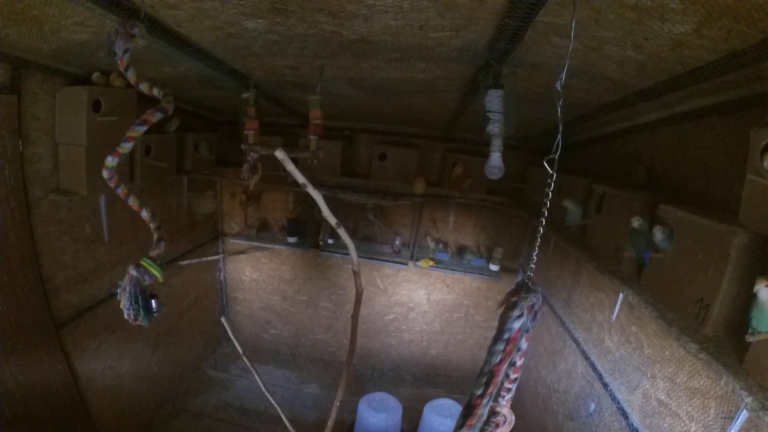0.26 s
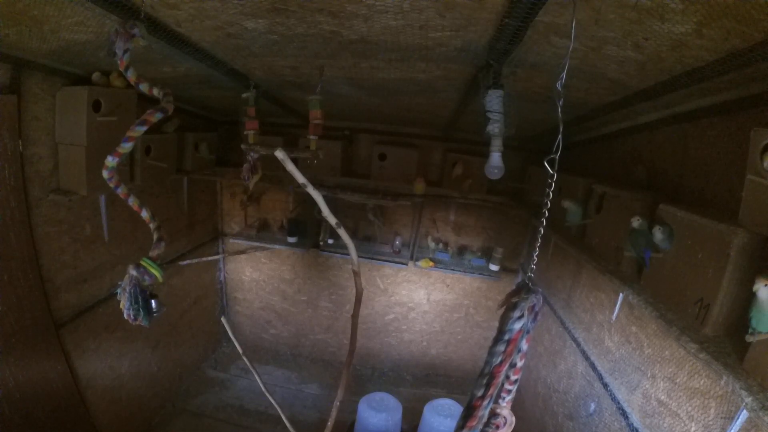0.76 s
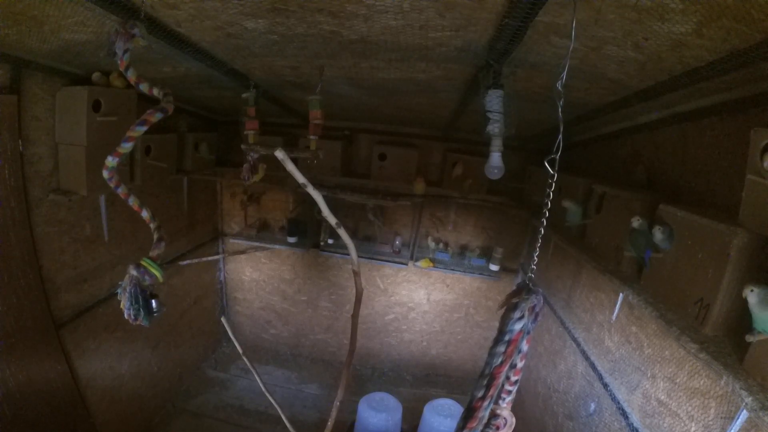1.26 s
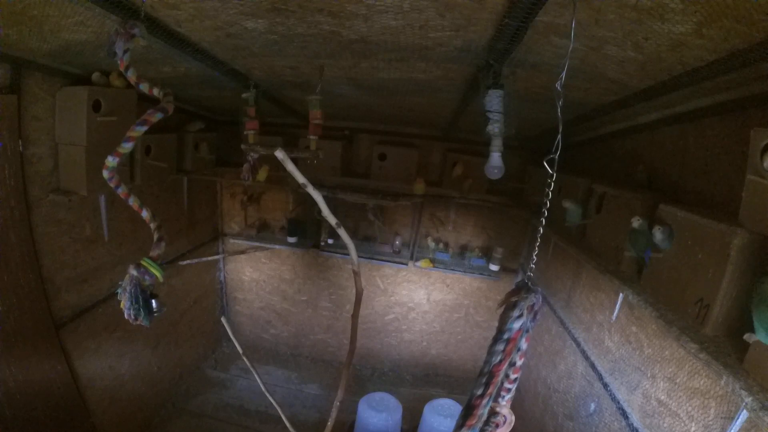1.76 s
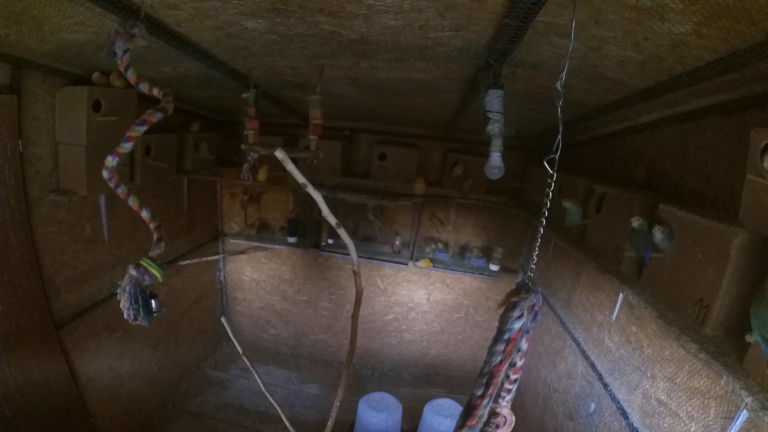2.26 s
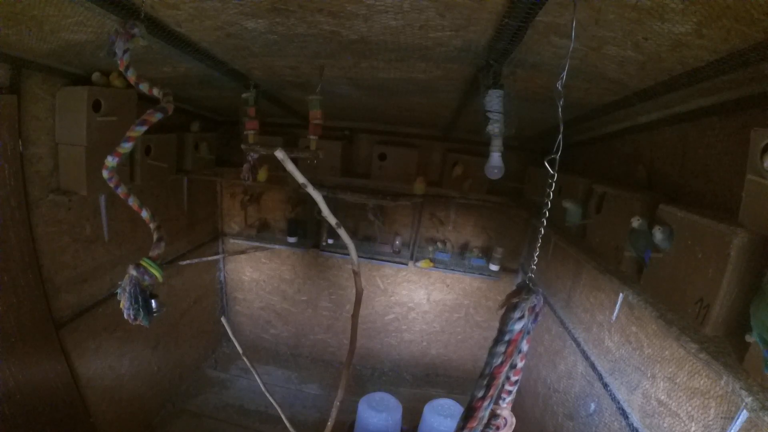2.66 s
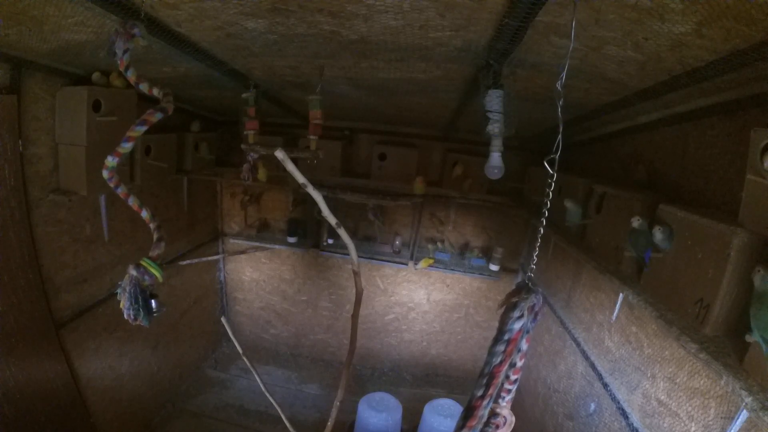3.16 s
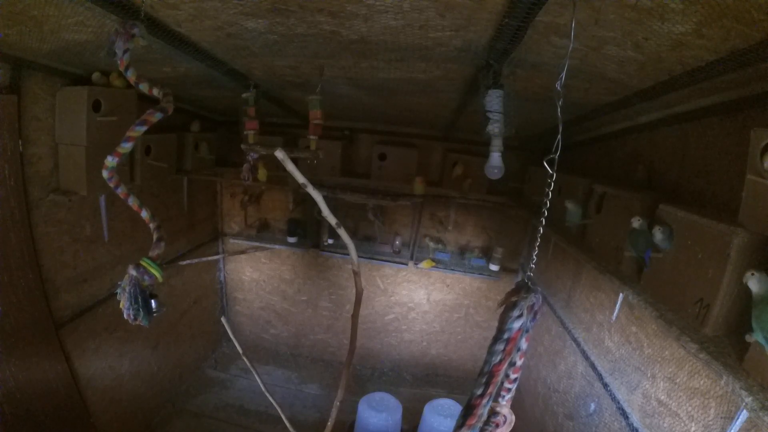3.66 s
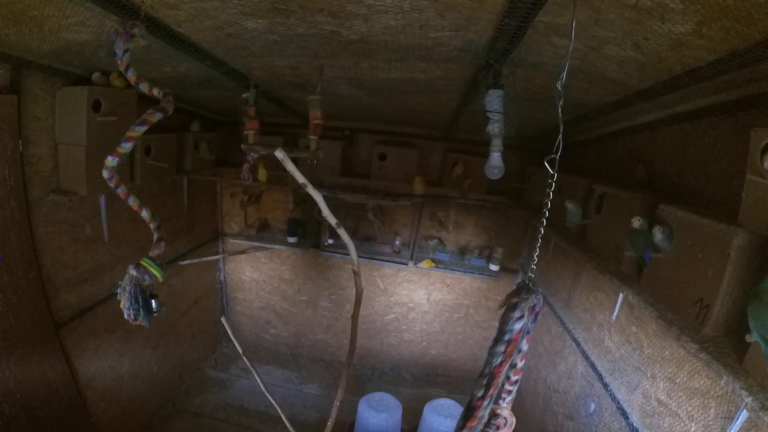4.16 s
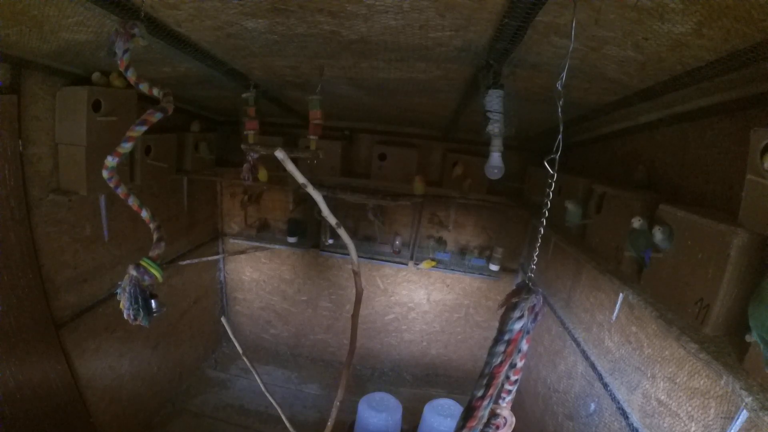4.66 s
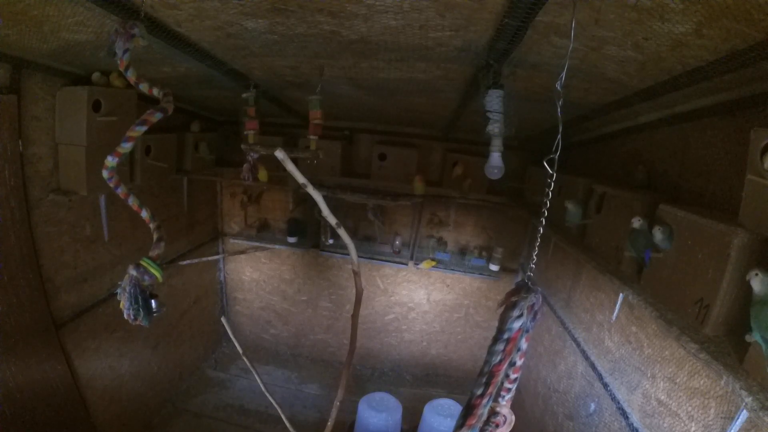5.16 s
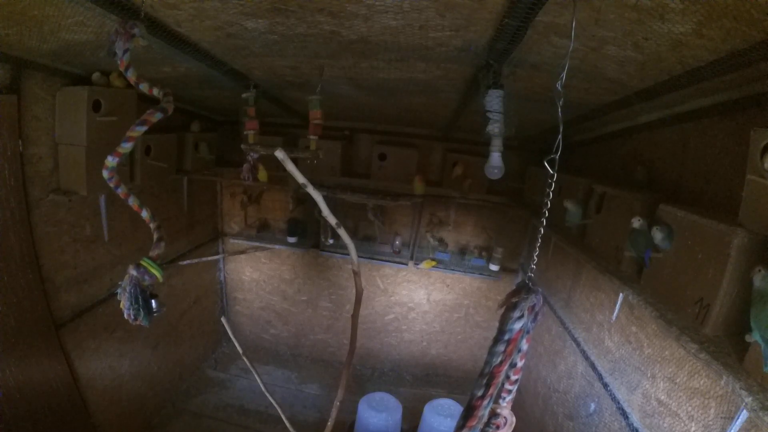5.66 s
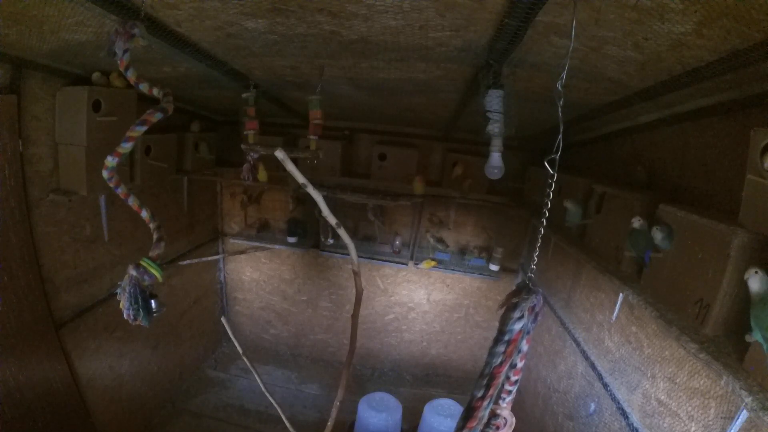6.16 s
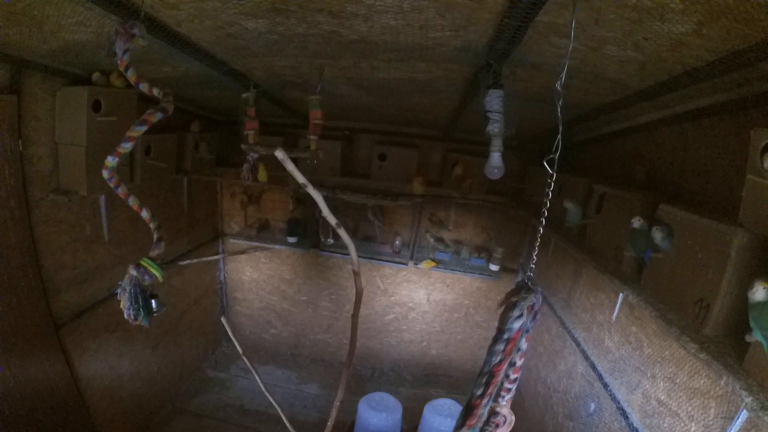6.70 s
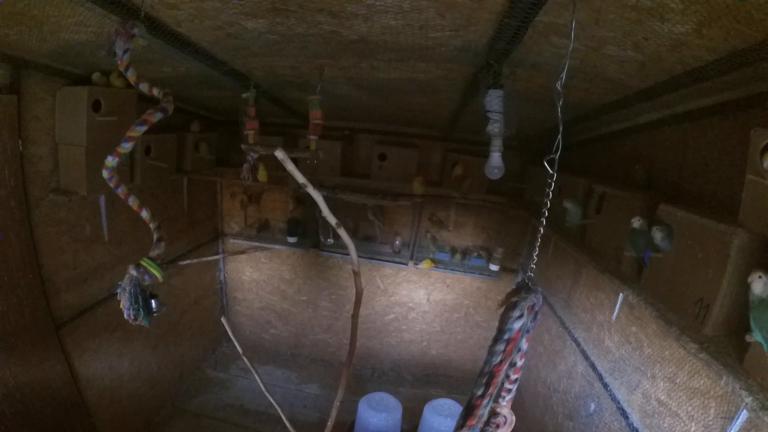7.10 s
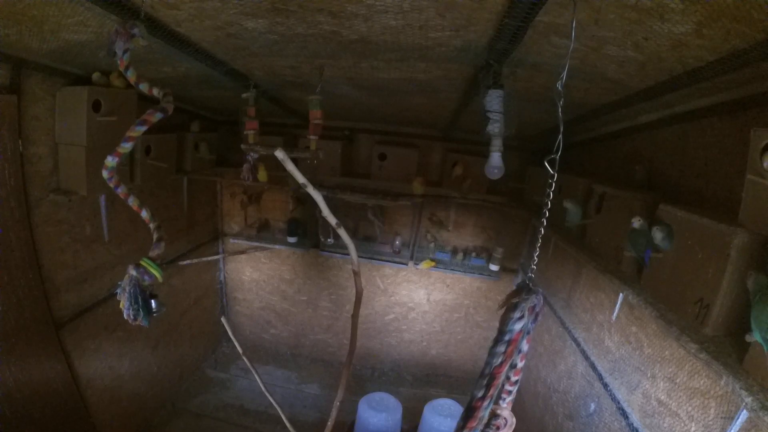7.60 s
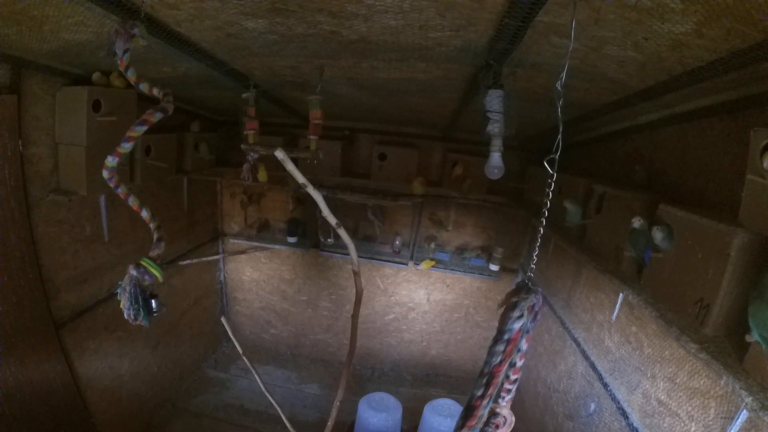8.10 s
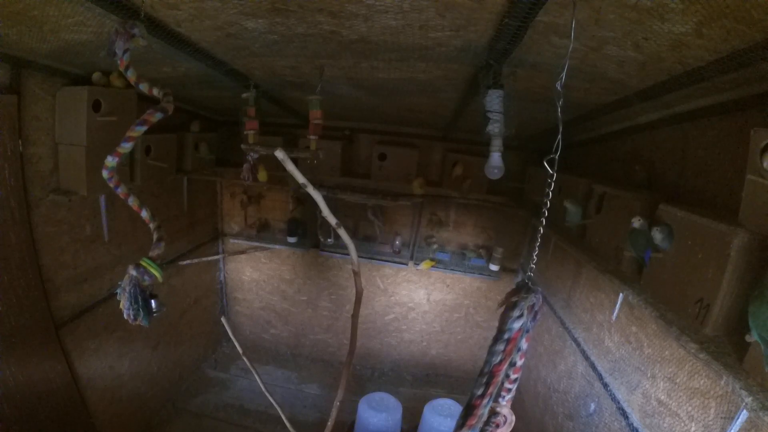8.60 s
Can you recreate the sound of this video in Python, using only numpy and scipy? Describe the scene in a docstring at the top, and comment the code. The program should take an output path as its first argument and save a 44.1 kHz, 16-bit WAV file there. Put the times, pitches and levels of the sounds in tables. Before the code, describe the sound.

A faint, low ventilation hum runs behind small parrots calling close by in a small wooden enclosure. Their shrill chirps flick upward in pitch, mixed with peeps and short gliding squeaks, some of them hoarse. The first half is busy; after a lull comes a quick cluster of chatter, a few isolated peeps and another squeaky burst at the end. The space adds only a very short echo.

```python
"""In a small boarded aviary, lovebirds give rising chirps that flip to a higher register, arched peeps
and chatter of short gliding squeaks. Each call is an oscillation of the syrinx, coloured by throat and
beak, that doubles its period and buzzes as it turns hoarse; the boards reflect it. Behind the birds a
ventilation fan hums, drives air through a duct and scrapes faintly against its housing.
A slipping sample clock modulates the phase of the whole sound, which gives loud notes a gritty edge."""
import sys
import numpy as np
from scipy import signal
from scipy.fft import rfft, irfft
from scipy.io import wavfile
from scipy.ndimage import map_coordinates

SR = 44100
rng = np.random.default_rng(int(sys.argv[2]) if len(sys.argv) > 2 else 0)


def master(y):
    """Save y as 16-bit WAV."""
    cut = np.clip(np.atleast_2d(y).T, -1, 1)
    pcm = np.round(cut * 32767)  # scale
    wavfile.write(sys.argv[1], SR, pcm.astype(np.int16))


N = 389844
TIME = np.arange(N) / SR

# lines of the fan's hum: pitch_hz, level_db
HUM_TONES = [(68, -63.5), (91, -75), (136, -71), (205, -78)]
# spectra of the draught's rumble and hiss: frequency_hz, relative_density_db
RUMBLE_SPECTRUM = [(10, 2), (25, 2.5), (50, -3), (90, -9.5), (160, -21.5), (300, -26.5), (600, -34.5),
                   (1100, -40.5), (1900, -49)]
HISS_SPECTRUM = [(1500, 7.5), (2500, 0), (4000, 7), (6000, 0.5), (9000, -11), (12000, -2), (15500, -4)]
# slow envelope of the rumble: time_s, relative_db
RUMBLE_ENVELOPE = [(0, -52.5), (.8, -49.5), (1.6, -53.5), (3.9, -56), (6.2, -58.5), (8.84, -53.5)]
# swells of the rush of air in the duct: peak_s, half_width_s, level_db
DUCT_GUSTS = [(0, 0.39, -58), (2.701, .5, -80), (5.0, 0.58, -71)]
# tones of the duct, relative to the rush: pitch_hz, relative_db
DUCT_MODES = [(573, -14), (609, -9.5), (690, -14.5), (764, -13.5), (1024, -12)]
# resonances of the fan housing: frequency_hz, bandwidth_hz, relative_db
HOUSING_MODES = [(1460, 410, -5), (2294, 200, 5), (2530, 210, 5.5), (2980, 200, 2.5), (4050, 840, -9),
                 (8700, 3500, -17)]
# partials of the syrinx, the half multiples due to period doubling: pitch_multiple, relative_db
SYRINX_PARTIALS = [(.5, -26), (1.5, -20.5), (2, -19.5), (2.5, -24.5), (3, -32.5)]
# response of throat and beak to those partials: frequency_hz, gain_db
THROAT_RESPONSE = [(1600, -7), (2300, 2), (5200, 5), (6600, 0), (7600, 3.5), (9000, -9), (11500, -1.5),
                   (13000, -2), (15500, -12.5)]
# chirps: start_s, lead_s, loud_s, pitch_hz, top_hz, lead_db, loud_db, top_db, hoarseness
CHIRP_CALLS = [ (0.019, 0.012, 0.024, 4990, 6344, -37.5, -25, -26.5, 0.48),
               (.130, .010, .032, 4110, 6400, -33, -20.5, -27, .33),
               (.347, .026, .016, 5150, 6520, -35, -24.5, -26.5, .55),
               (.492, 0.015, .021, 5036, 6510, -47, -28.5, -26.5, 0.56),
               (.630, 0.023, .012, 5360, 6230, -30, -24, -29, 0.64),
               (.942, 0.029, .016, 5453, 6200, -27.5, -20.5, -35, 0.41),
               (1.055, .011, 0.0054, 5240, 6660, -31, -16.5, -27, 0.48),
               (1.483, .035, .016, 4556, 6820, -38.5, -26, -30, 0.82),
               (2.898, .019, .034, 4470, 6320, -31, -22, -24, .3),
               (3.208, .012, 0.049, 4340, 6280, -33, -23.5, -22, .38),
               (3.596, .021, .035, 4400, 6400, -35, -21, -25.5, .32), ]
# squeaks of the chatter: start_s, length_s, first_hz, last_hz, level_db, swell_db, hoarseness
SQUEAK_CALLS = [ (0.106, 0.016, 3590, 4040, -39, 13, 0.33), (.908, 0.041, 3930, 3798, -27.5, 0.5, 0.2),
                (1.084, 0.017, 4280, 4185, -26.5, 8, 0.6), (1.116, 0.057, 3416, 2780, -36.5, -5, 0.5),
                (1.169, 0.037, 3276, 3528, -25.5, -1, 0.13), (1.598, 0.095, 3590, 3250, -46, 2, 0.33),
                (1.601, 0.064, 1746, 1670, -56.5, 4, .1), (1.675, 0.039, 3970, 4005, -36, 8, 0.18),
                (1.702, 0.051, 3333, 3216, -42.5, 1, .17), (1.942, 0.049, 3454, 3386, -45.5, -7, 0.18),
                (3.323, 0.042, 5097, 5077, -19.5, 5.5, .04), (3.363, 0.025, 6430, 6980, -29.5, 12, 0.17),
                (3.496, 0.068, 3550, 3945, -39.5, 4, 0.16), (3.55, 0.063, 4020, 4130, -29.5, -6.5, 0.16),
                (5.284, .012, 4290, 3910, -38.5, 1, 0.38), (5.417, 0.013, 3900, 3794, -25.5, 9, 0.07),
                (5.574, 0.0065, 3584, 3600, -30, 1, 0.36), (5.588, 0.021, 4107, 3995, -26.5, -16.5, 0.21),
                (5.617, 0.043, 3000, 3105, -37, -6.5, 0.24), (5.663, 0.116, 4140, 4014, -34.5, -4.5, .22),
                (5.672, 0.047, 3200, 3224, -32, -9.5, 0.12), (5.835, 0.0099, 4930, 4800, -40, -6, .5),
                (5.842, .036, 4117, 3960, -32, 0, 0.5), (5.883, 0.044, 3680, 3694, -24.5, -3, 0.08),
                (5.928, 0.049, 3902, 3906, -21.5, 1, .14), (5.979, 0.037, 4047, 3930, -37, -8, 0),
                (7.432, 0.013, 3030, 3090, -64, -9, 0.12), (7.611, 0.045, 3390, 3305, -54, 22, .2),
                (8.574, 0.0084, 3740, 3950, -43, 12, .4), (8.587, 0.015, 4170, 4116, -24.5, -7, .15),
                (8.612, 0.017, 4160, 4027, -26.5, 4, 0.51), (8.593, 0.057, 6070, 5565, -35.5, -2, 0.42),
                (8.651, 0.045, 3150, 3070, -37, -8, 0.09), (8.68, 0.036, 3920, 4240, -34.5, -4, 0.16),
                (8.688, .062, 2050, 2220, -47, -10, 0.12), (8.711, 0.045, 3458, 3325, -29.5, 13.5, 0.06),
                (8.76, 0.023, 3488, 3796, -23.5, 12, 0.05), ]
# peeps: start_s, rise_s, fall_s, crest_hz, end_hz, crest_db, end_db, hoarseness
PEEP_CALLS = [ (.826, 0.045, 0.023, 4243, 4084, -27, -20.5, 0.16),
              (1.767, 0.013, 0.023, 4120, 4100, -28, -34.5, 0.3),
              (1.913, 0.03, 0.027, 4226, 4010, -37.5, -49.5, 0.4),
              (2.247, .018, 0.1, 4148, 3966, -35.5, -29, 0.29),
              (2.469, 0.032, 0.091, 4170, 3754, -32, -49.5, 0.26),
              (2.680, 0.028, 0.014, 4180, 4450, -49.5, -55, 1.1),
              (4.020, 0.015, 0.038, 3280, 3260, -51, -51, 0.14),
              (5.297, 0.028, .085, 4623, 3936, -30.5, -27.5, 0.49),
              (6.602, 0.046, 0.0693, 4210, 4112, -28, -26, .8),
              (6.923, 0.028, 0.088, 4100, 3676, -45, -53, 0.33),
              (7.650, .031, 0.0248, 3845, 3380, -36.5, -52.5, 0.62),
              (8.202, 0.028, 0.043, 3470, 3130, -56, -65, 0.37), ]
# reflections from the nearest boards: delay_s, gain_db
BOARD_ECHOES = [(.0023, -20.5), (.0051, -9.5), (.0087, -17.5)]

CALM_RUSH_DB = -82.5


def from_db(db):
    """Amplitude ratio of a level in decibels."""
    return 10 ** (np.asarray(db) / 20)


def unit_rms(x):
    """Normalisation to unit mean power."""
    return x / np.sqrt(np.mean(x ** 2) + 1e-20)


def interpolate(rows, positions):
    """Linear interpolation of a table's other columns along its first."""
    axis, *columns = np.transpose(rows)
    return [np.interp(positions, axis, column) for column in columns]


def white(size):
    """Gaussian noise with a flat spectrum."""
    return rng.standard_normal(max(size, SR // 2))[:size]


def wobble(hz, size):
    """Random fluctuation of unit rms, low-passed at hz."""
    lowpass = signal.butter(2, hz, fs=SR, output="sos")
    return unit_rms(signal.sosfilt(lowpass, white(size + SR // 10))[-size:])


def band_noise(low_hz, high_hz, size):
    """Band-limited noise of unit rms."""
    bandpass = signal.butter(2, [low_hz, high_hz], "band", fs=SR, output="sos")
    return unit_rms(signal.sosfilt(bandpass, white(size)))


def coloured_noise(spectrum):
    """Spectrally shaped noise of unit rms, falling 12 dB an octave above the last point."""
    hz, db = np.transpose(spectrum)
    bins_hz = np.maximum(np.arange(N // 2 + 1) * SR / N, 1)
    gain = from_db(np.interp(np.log(bins_hz), np.log(hz), db))
    rolloff = np.minimum(1, hz[-1] / bins_hz) ** 2
    return unit_rms(irfft(rfft(white(N)) * gain * rolloff, N))


def resonance(x, hz, width_hz):
    """Forced response of a damped oscillator with unit peak gain."""
    radius = np.exp(-np.pi * width_hz / SR)
    feedback = [1, -2 * radius * np.cos(2 * np.pi * hz / SR), radius ** 2]
    return signal.lfilter(np.array([1, 0, -1]) * (1 - radius ** 2) / 2, feedback, x)


def tones(lines, waver_rad):
    """Sinusoids whose spectral lines are broadened by random phase modulation."""
    return sum(np.sqrt(2) * from_db(db) * np.sin(2 * np.pi * hz * TIME + waver_rad * wobble(28, N))
               for hz, db in lines)


def rush_level():
    """Level in dB of the rush in the duct: Gaussian gusts superposed on a calm flow."""
    gusts = sum(from_db(db) * np.exp(-.5 * ((TIME - peak_s) / half_width_s) ** 2)
                for peak_s, half_width_s, db in DUCT_GUSTS)
    return 20 * np.log10(from_db(CALM_RUSH_DB) + gusts)


def fan(rush_db, rumble_boost_db=2, hiss_db=-76):
    """Tonal hum plus broadband flow noise; the duct's noise and tones swell with the rush."""
    rumble_db = interpolate(RUMBLE_ENVELOPE, TIME)[0] + rumble_boost_db + wobble(2.6, N)
    rumble = from_db(rumble_db) * coloured_noise(RUMBLE_SPECTRUM)
    duct = from_db(-3) * band_noise(290, 790, N) + tones(DUCT_MODES, waver_rad=.48)
    hum = tones(HUM_TONES, waver_rad=.58)
    hiss = from_db(hiss_db) * coloured_noise(HISS_SPECTRUM)
    return hum + rumble + from_db(rush_db) * duct + hiss


def rattle(rush_db, rotation_hz=64.3, touch_s=.0014, calm_db=-65.5, gust_share=.15):
    """Friction excites the housing's modes: a scrape each turn, steady rubbing, loose spells of buzz."""
    turns = np.cumsum(rotation_hz * (1 + .036 * wobble(5.7, N))) / SR
    from_touch_s = (turns % 1 - .5) / rotation_hz
    scrape = np.exp(-.5 * (from_touch_s / touch_s) ** 2) * from_db(2 * wobble(25, N))
    looseness = np.clip(wobble(6.6, N), 0, 1)
    rubbing = np.maximum(from_db(-14), from_db(-5.5) * looseness)
    force = np.maximum(scrape, rubbing) * white(N)
    housing = sum((-1) ** k * from_db(db) * resonance(force, hz, width_hz)
                  for k, (hz, width_hz, db) in enumerate(HOUSING_MODES))
    sizzle = from_db(-74) * looseness * band_noise(5900, 10200, N)
    level_db = calm_db + gust_share * (rush_db - CALM_RUSH_DB)
    return from_db(level_db) * unit_rms(housing) + sizzle


def syrinx(stages, edge_s=.002, quaver_hz=80, quaver_db=1.7, quaver_rate_hz=110,
           warble_hz=270, flutter_rate_hz=400, buzz_cycles=5, rasp_db=-28, soft_db=-38):
    """Oscillation through stages (time_s, pitch_hz, level_db, hoarseness), period-doubled when hoarse."""
    start_s, end_s = stages[0][0] - edge_s, stages[-1][0] + edge_s
    span = np.arange(max(int(start_s * SR), 0), min(int(end_s * SR), N))
    t, size = TIME[span], len(span)
    hz, db, hoarse = interpolate(stages, t)
    hoarse = np.clip(hoarse, 0, 1)
    # all but the purest notes quaver in pitch and strength
    unsteady = np.clip(hoarse / .2, 0, 1)
    hz = hz + unsteady * quaver_hz * wobble(quaver_rate_hz, size)
    db = db + unsteady * quaver_db * wobble(quaver_rate_hz, size)
    phase = 2 * np.pi * np.cumsum(hz + warble_hz * hoarse * wobble(flutter_rate_hz, size)) / SR
    # a hoarse syrinx pulses every few cycles, which puts sidebands around the tone
    buzz = np.cos(phase / buzz_cycles)
    phase = phase + hoarse ** 2 * buzz
    tone = np.sin(phase)
    # in soft notes the harmonics are stronger against the fundamental
    harmonic_gain = from_db(.46 * np.maximum(soft_db - db, 0))
    doubling = np.clip(4 * hoarse - .2, 0, 1)
    for multiple, partial_db in SYRINX_PARTIALS:
        throat_db = interpolate(THROAT_RESPONSE, hz * multiple)[0]
        gain = (doubling if multiple % 1 else harmonic_gain) * from_db(partial_db + throat_db)
        tone += gain * np.sin(phase * multiple) * (hz * multiple < SR / 2)
    tone += hoarse * from_db(rasp_db) * band_noise(3500, 12000, size)
    shimmer = .25 * wobble(flutter_rate_hz, size)
    pulsing = unit_rms(np.exp(hoarse * (shimmer + buzz)))
    gate = np.clip(np.minimum(t - start_s, end_s - t) / edge_s, 0, 1)
    voice = np.zeros(N)
    voice[span] = np.sqrt(2) * from_db(db) * gate * pulsing * tone
    return voice


def chirp(start_s, lead_s, loud_s, pitch_hz, top_hz, lead_db, loud_db, top_db, hoarse,
          attack_s=.003, climb_hz_per_s=10000, flip_s=.0015, fade_s=.026):
    """A register break: after a soft lead-in, a loud note climbs, flips to a higher pitch and fades."""
    loud_at_s = start_s + max(lead_s, 2 * attack_s)
    flip_at_s = loud_at_s + loud_s
    onset_hoarse = .85 * hoarse
    return syrinx([(start_s, 3975, lead_db - 6.5, onset_hoarse),
                   (start_s + (loud_at_s - start_s) / 3, .98 * pitch_hz, lead_db + 1.5, onset_hoarse),
                   (loud_at_s - attack_s, pitch_hz - climb_hz_per_s * attack_s, lead_db, hoarse),
                   (loud_at_s, pitch_hz, loud_db, onset_hoarse),
                   (flip_at_s, pitch_hz + climb_hz_per_s * loud_s, loud_db - 3.5, hoarse),
                   (flip_at_s + flip_s, top_hz, top_db, hoarse),
                   (flip_at_s + flip_s + fade_s, top_hz, top_db - 7.5, .54 * hoarse)])


def beak(voice):
    """A radiation notch: the open beak radiates poorly just above its main resonance."""
    return voice - .77 * resonance(voice, hz=8000, width_hz=1300)


def aviary(direct, t60_s=.2, build_s=.019, tail_db=-5.5):
    """Reverberation by convolution: early reflections from the boards, then an exponential tail."""
    t = TIME[:SR // 2]
    tail = white(len(t)) * from_db(-60 * t / t60_s) * np.clip(t / build_s, 0, 1)
    response = from_db(tail_db) * tail / np.sqrt(np.sum(tail ** 2))
    response[0] += 1
    for delay_s, gain_db in BOARD_ECHOES:
        response[int(delay_s * SR)] += from_db(gain_db)
    return signal.fftconvolve(direct, response)[:N]


def squeak(start_s, length_s, first_hz, last_hz, level_db, swell_db, hoarse,
           attack_s=.004, release_s=.008):
    """A linear frequency sweep that swells or fades between a quick attack and a release."""
    end_s = start_s + length_s
    first_db, last_db = level_db - swell_db / 2, level_db + swell_db / 2
    return syrinx([(start_s - attack_s, first_hz, first_db - 12, hoarse),
                   (start_s, first_hz, first_db, hoarse),
                   (end_s, last_hz, last_db, hoarse),
                   (end_s + release_s, last_hz, last_db - 14, hoarse)])


def peep(start_s, rise_s, fall_s, crest_hz, end_hz, crest_db, end_db, hoarse,
         crack_after_s=.024, crack_width_s=.0065, crack_hz=589, crack_dip_db=9):
    """Frequency modulation in an arch: the voice scoops to a crest, cracks and clears as it settles."""
    scoop = (start_s, .82 * crest_hz, crest_db - 19.5, hoarse / 2)
    progress = np.linspace(0, 1, 20)
    crack = hoarse * np.exp(-.5 * ((fall_s * progress - crack_after_s) / crack_width_s) ** 2)
    hz = end_hz + (crest_hz - end_hz) * (1 - progress) ** 1.6 + crack_hz * crack
    db = crest_db + (end_db - crest_db) * progress - crack_dip_db * crack
    roughness = hoarse * (.67 * (1 - progress ** 2) + .12 * progress ** 2) + crack
    return syrinx([scoop, *zip(start_s + rise_s + fall_s * progress, hz, db, roughness)])


def scene():
    """Superposition of the reverberant birds and the fan at one point, alike in both channels."""
    rush_db = rush_level()
    chirps = sum(chirp(*row) for row in CHIRP_CALLS)
    squeaks = sum(squeak(*row) for row in SQUEAK_CALLS)
    peeps = sum(peep(*row) for row in PEEP_CALLS)
    mono = fan(rush_db) + rattle(rush_db) + aviary(beak(chirps + squeaks + peeps))
    return np.array([mono, mono])


def record(dry, slip_s=.00002, slip_hz=1152, cutoff_hz=15400):
    """Clock jitter: sample times creep and snap back, adding sidebands; a low-pass cuts the top."""
    read_at = (TIME + slip_s * (TIME * slip_hz % 1)) * SR
    slipped = np.array([map_coordinates(channel, [read_at], order=3, mode="nearest") for channel in dry])
    lowpass = signal.ellip(10, .1, 80, cutoff_hz, fs=SR, output="sos")
    return signal.sosfilt(lowpass, slipped)


dry = scene()
out = record(dry)
master(out)
```